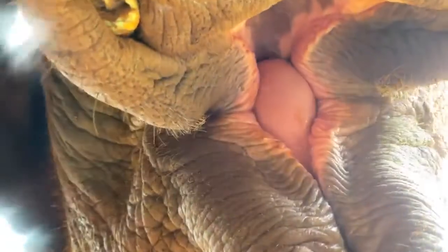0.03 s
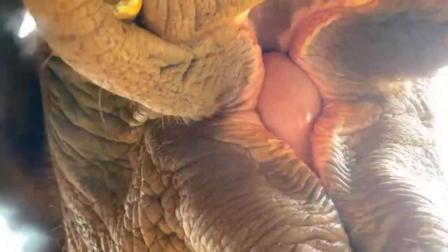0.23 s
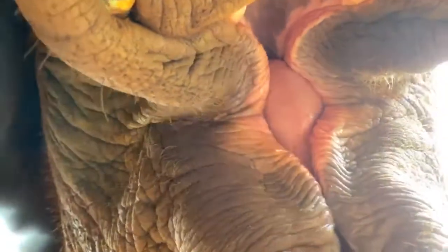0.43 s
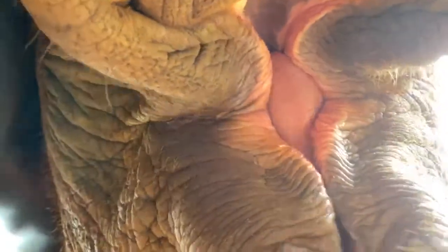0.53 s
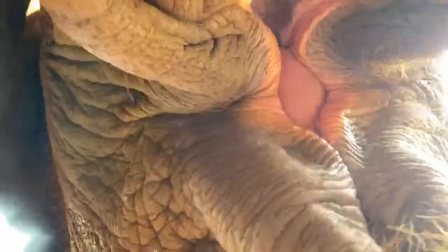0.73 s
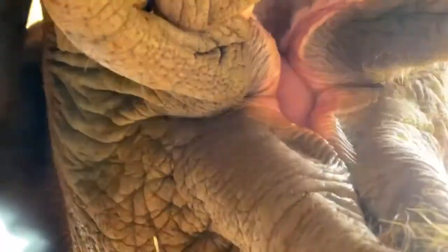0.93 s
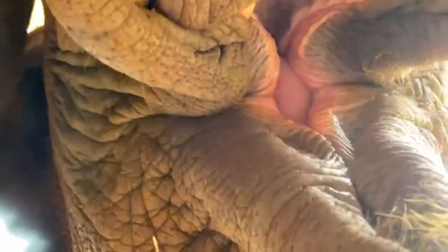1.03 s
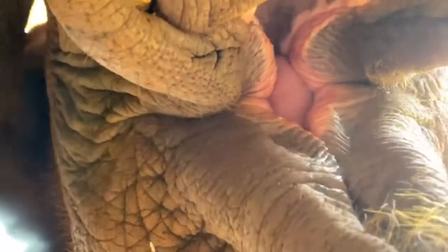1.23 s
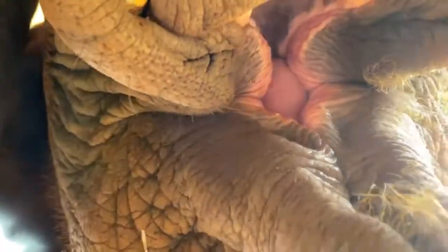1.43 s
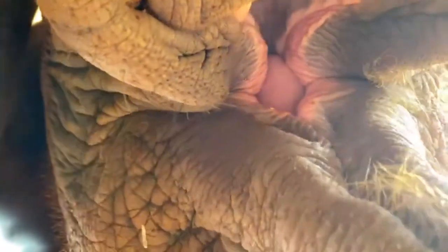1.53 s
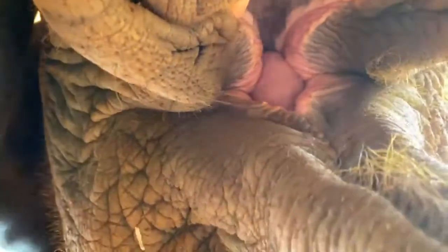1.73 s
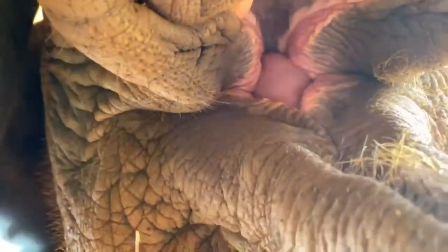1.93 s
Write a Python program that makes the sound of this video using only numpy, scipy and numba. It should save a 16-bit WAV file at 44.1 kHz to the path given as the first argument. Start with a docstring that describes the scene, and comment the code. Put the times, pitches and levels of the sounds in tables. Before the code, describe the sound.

A close elephant's deep growl builds, then fades into soft gulps and mouth smacks.

```python
"""A small stall, the microphone close to the wide-open mouth of a growling elephant.
Slow pulses of the vocal folds ring throat and mouth, quicken into a rough rumble, lock briefly
into a clean note and die away in a few low gulps. Breath thuds on the microphone and the wet mouth
smacks; then hay rustles in the trunk over a low background hum."""
import sys
import numpy as np
from scipy import signal
from scipy.fft import rfft, irfft
from scipy.io import wavfile
from scipy.ndimage import uniform_filter1d, minimum_filter1d
from numba import njit

SR = 44100
rng = np.random.default_rng(int(sys.argv[2]) if len(sys.argv) > 2 else 0)


def generate_wav(sig):
    """Save sig (samples, or channels by samples) to the path in sys.argv[1] as 16-bit PCM at SR."""
    pcm = np.round(np.clip(np.atleast_2d(sig).T, -1, 1) * 32767).astype(np.int16)
    wavfile.write(sys.argv[1], SR, pcm)


N = 88200

# centre of the throat resonance: t/s, f/Hz
THROAT_CENTRE = [(0, 148.1), (.19, 150.6), (.29, 196), (.33, 237), (.44, 223.7), (.48, 250), (.52, 250.4),
                 (.565, 250.7), (.59, 231.3), (.85, 233.3)]
# the clean note: t/s, f/Hz, level/dB
CLEAN_NOTE = [(.58, 108.8, -24.5), (.603, 109.9, -9.5), (.63, 107.9, -5), (.665, 107.3, -11.5),
              (.70, 106.7, -10.5), (.725, 95.8, -18), (.77, 107, -39)]
THROAT_PAN_DB, THROAT_ROOM_DB = 2, -17


def undb(db):
    return 10 ** (np.asarray(db) / 20)


def clock():
    return np.arange(N) / SR


def curve(table, column=1):
    """One column of a table, joined by straight lines in time."""
    table = np.array(table)
    return np.interp(clock(), table[:, 0], table[:, column])


def swell(at, length):
    """A bell-shaped rise and fall around one moment."""
    return np.exp(-.5 * ((clock() - at) / length) ** 2)


def unit(x):
    return x / np.sqrt(np.mean(x ** 2) + 1e-18)


def noise():
    return rng.standard_normal(N)


def grainy(spread_db):
    """Noise broken into tiny grains of uneven strength."""
    size = 64
    return unit(noise() * undb(spread_db * np.repeat(rng.standard_normal(N // size + 1), size)[:N]))


def even(x):
    """Hold the slow level at 1 and keep the single pulses."""
    size = int(.043 * SR)
    power = uniform_filter1d(uniform_filter1d(unit(x) ** 2, size), size // 2)
    return x / np.std(x) / np.sqrt(np.abs(power) + 1e-4)


def colour(x, points, tilt_db=0):
    """Causal filter with an outline (f/Hz, level/dB), a tilt per octave and steep skirts."""
    hz, db = np.array(points).T
    knots = np.log2(hz)
    octave = np.log2(np.maximum(np.fft.rfftfreq(2 * N, 1 / SR), 1))
    gain_db = np.interp(octave, knots, db) + tilt_db * (np.clip(octave, knots[0], knots[-1]) - 10)
    gain_db -= 24 * (np.maximum(octave - knots[-1], 0) + np.clip(knots[0] - octave, 0, 2))
    cepstrum = irfft(np.log(undb(gain_db)))
    cepstrum[1:N] *= 2  # folded for minimum phase
    cepstrum[N + 1:] = 0
    return irfft(rfft(x, 2 * N) * np.exp(rfft(cepstrum)))[:N]


@njit
def svf(x, hz, width):
    """State-variable band-pass with a moving centre."""
    y, band, low = np.empty(len(x)), 0., 0.
    for i in range(len(x)):
        g, damping = np.tan(np.pi * hz[i] / SR), width / hz[i]
        v = (band + g * (x[i] + 1e-18 - low)) / (1 + g * (g + damping))
        band, low, y[i] = 2 * v - band, low + 2 * g * v, damping * v
    return y


def resonate(x, hz, width):
    """A resonance applied twice, for steep sides; width of each pass in Hz."""
    hz = np.minimum(hz * np.ones(N), .45 * SR)
    return svf(svf(x, hz, float(width)), hz, float(width))


def place(x, pan_db, room_db, lag_s=.0001):
    """Direct sound plus the short echo of the stall; positive pan and lag favour the left."""
    t, t60_s = clock(), .15
    tail = rng.standard_normal((2, N)) * np.exp(-np.log(1000) * t / t60_s) * (t > .003)
    tail /= np.sqrt(np.sum(tail ** 2, axis=1, keepdims=True))
    direct = np.array([x, np.interp(t - lag_s, t, x)]) * undb(np.array([[pan_db], [-pan_db]]) / 2)
    echo = undb(room_db) * signal.fftconvolve(x[None], tail)[:, :N]
    return (direct + echo) / np.cosh(pan_db * np.log(10) / 40)


def hum():
    """Low background drone, nearly the same on both sides."""
    # spectrum of the drone: f/Hz, level/dB
    spectrum = [(20, -35.5), (40, -21), (58, 5), (75, -2), (105, -19), (148, -6.5), (185, -20.5),
                (260, -25.5)]
    # its slow drift: t/s, level/dB
    level = [(0, -32.5), (.8, -47), (1.05, -54), (1.4, -48.5), (1.7, -48.5), (2, -44)]
    return place(even(colour(noise(), spectrum)) * undb(curve(level)), pan_db=-1.5, room_db=-20)


def hay():
    """Dry stalks rub as the trunk brings them nearer, with one thin fizz on the way."""
    # spectrum of the rustle: f/Hz, level/dB
    spectrum = [(88, -32), (150, 5), (185, -20), (262, -13.5), (450, -0.5), (624, -6.5), (900, -2),
                (1050, -11), (1770, -8.5), (2270, -12), (2600, -10.5), (3030, -17), (6060, -21),
                (15000, -39)]
    # its rise and fall: t/s, level/dB
    level = [(0, -46.5), (.9, -54.5), (1.02, -63), (1.14, -56), (1.28, -53), (1.35, -62.5), (1.55, -60),
             (1.66, -52.5), (1.8, -47), (1.92, -47), (2, -44.5)]
    mid, side = (unit(colour(grainy(spread_db=1.5), spectrum)) for _ in range(2))
    rustle = np.array([mid + side, mid - side]) * undb(curve(level))
    fizz = unit(resonate(grainy(spread_db=6.5), hz=10640, width=7000))
    fizz *= undb(-74.5) * swell(at=1.244, length=.1)
    return rustle + place(fizz, pan_db=-7, room_db=11.5)


def puffs():
    """Air from the mouth thuds softly on the microphone."""
    # gusts of breath: t/s, length/s, level/dB
    gusts = [(0.064, 0.012, -28.5), (0.216, 0.1, -31.5), (0.464, 0.03, -35.5), (0.637, 0.012, -26)]
    # spectrum of the thud: f/Hz, level/dB
    spectrum = [(15, -29.5), (40, -16.5), (75, -6), (110, 7), (160, -17.5)]
    return even(colour(noise(), spectrum)) * sum(undb(db) * swell(at, span) for at, span, db in gusts)


def smacks():
    """Brief crackles of wet lips, tongue and trunk."""
    # wet contacts: t/s, decay/s, level/dB, tilt/(dB per octave)
    contacts = [(0.233, .011, -45, 8.5), (0.328, .0062, -42.5, 5.5), (0.733, .011, -33, -3.5),
                (.81, 0.031, -53, 8), (.861, 0.0054, -28.5, -1), (1.136, 0.0026, -36, -2),
                (1.27, 0.0079, -43, -10.5), (1.382, 0.0066, -48.5, 2.5), (1.467, 0.012, -55, 6.5),
                (1.574, 0.0084, -38, 0.5), (1.586, 0.0073, -44.5, 2.5), (1.667, 0.0081, -47, 7)]
    # spectrum of a smack: f/Hz, level/dB
    spectrum = [(60, -33), (200, 4), (400, 0), (650, -13), (1130, -1.5), (1900, -9.5), (2400, -12),
                (3400, -17.5), (4200, -20), (14000, -47.5)]
    out, attack_s = 0, .0015
    for at, decay, db, tilt_db in contacts:
        age = np.maximum(clock() - at, 0)
        envelope = (1 - np.exp(-age / attack_s)) * np.exp(-age / decay)
        out += unit(colour(grainy(spread_db=.5), spectrum, tilt_db)) * undb(db) * envelope
    return place(out, pan_db=4, room_db=2.5, lag_s=0)


def gulps():
    """Short hollow rings of the throat as it relaxes."""
    # rings after the growl: t/s, f/Hz, decay/s, relative level/dB
    rings = [(0.863, 374.8, 0.024, -35.5), (0.876, 209, 0.027, -43), (0.948, 176, 0.054, -36.5),
             (.956, 265.6, 0.018, -34), (1.048, 225, 0.0067, -32.5), (1.073, 183.6, 0.028, -37),
             (1.107, 203.5, 0.033, -41.5), (1.26, 328, 0.021, -48.5), (1.385, 274.6, 0.015, -49.5),
             (1.573, 251, 0.011, -42.5), (1.595, 189, 0.0038, -31)]
    out, attack_s = 0, .0019
    for at, hz, decay, db in rings:
        age = np.maximum(clock() - at, 0)
        envelope = (1 - np.exp(-age / attack_s)) * np.exp(-age / decay)
        out += 2 * undb(db) * np.sin(2 * np.pi * hz * age) * envelope
    return place(out, pan_db=2, room_db=-7)


def moan():
    """A thin wavering tone that climbs with the throat resonance and leads into the growl."""
    # course of the moan: t/s, level/dB
    level = [(0, -29), (.07, -28.5), (.13, -28), (.165, -34.5), (.21, -27), (.26, -21.5), (.30, -20),
             (.32, -28), (.35, -62.5)]
    wobble = unit(colour(noise(), [(10, .0055), (60, .016)]))
    phase = 2 * np.pi * np.cumsum(curve(THROAT_CENTRE) * (1 + .025 * wobble)) / SR
    tone = np.sqrt(2) * np.sin(phase) * undb(curve(level)) * (clock() < level[-1][0])
    return place(tone, pan_db=5, room_db=-6.5)


def note():
    """The folds lock into a steady pitch; the resonances of throat and mouth lift single harmonics."""
    # harmonics of the note: multiple, relative level/dB
    harmonics = [(2, 2), (3, -12), (4, -24.5), (5, -21.5), (6, -24), (7, -20), (8, -48), (9, -30)]
    # high harmonics that swell in passing: t/s, length/s, multiple, level/dB
    overtones = [(.622, .028, 22, -33.5), (.62, .028, 23, -33), (.64, .014, 11, -39), (.668, .016, 46, -38)]
    # ring of the mouth on the eighth harmonic: t/s, level/dB
    ring_level = [(.57, -44), (.61, -19), (.665, -16.5), (.695, -19.5), (.72, -30), (.76, -54)]
    t = clock()
    wobble = unit(colour(noise(), [(10, 0), (60, 0)]))
    phase = 2 * np.pi * np.cumsum(curve(CLEAN_NOTE) * (1 + .004 * wobble)) / SR
    gate = uniform_filter1d(1. * ((t > CLEAN_NOTE[0][0]) & (t < CLEAN_NOTE[-1][0])), size=400)
    tone = sum(undb(db) * np.sin(k * phase) for k, db in harmonics) * undb(curve(CLEAN_NOTE, column=2))
    tone += sum(undb(db) * swell(at, length) * np.sin(k * phase) for at, length, k, db in overtones)
    ring = np.sin(8 * phase) * undb(curve(ring_level))
    return np.sqrt(2) * (place(gate * tone, THROAT_PAN_DB, THROAT_ROOM_DB)
                         + place(gate * ring, pan_db=12.5, room_db=-22.5))


def folds():
    """Uneven pulses of the vocal folds, the rush of air after each and the air that leaks around it."""
    # bouts of pulses: start/s, end/s, rate/Hz, period jitter (0-1), share of air (0-1)
    bouts = [(.038, .26, 19.8, .02, .6), (.312, .41, 23.1, .005, .15), (.421, .495, 48, .015, .2),
             (.508, .59, 42.8, .008, .15), (.597, .735, 107, .025, .5), (.742, .81, 55, .15, .5),
             (.824, .87, 45, .04, .4)]
    air_decay_s, open_samples = .018, int(.015 * SR)
    pulses = np.zeros(N)
    for start, end, rate, jitter, _ in bouts:
        at = start
        for late, strength_db in rng.standard_normal((24, 2)):
            if at < end:
                pulses[int(at * SR)] += undb(strength_db) / np.sqrt(rate)
            at += max(1 + jitter * late, .3) / rate
    fall = 2 / (air_decay_s * SR)
    flow = signal.lfilter([1], [1, -np.exp(-fall)], pulses ** 2) * fall
    opening = uniform_filter1d(uniform_filter1d(pulses ** 2, open_samples), open_samples)
    # the mean terms keep a little air moving between pulses
    rush = grainy(spread_db=3) * np.sqrt(np.abs(uniform_filter1d(flow, size=150)) + .028 * flow.mean())
    leak = grainy(spread_db=3) * np.sqrt(np.abs(opening) + .008 * opening.mean())
    air_share = curve([((start + end) / 2, air) for start, end, _, _, air in bouts])
    return pulses + air_share * rush, rush, leak


def rasp(leak, upper_db):
    """Air leaking through the folds lights up the upper resonances of the mouth."""
    # upper resonances of the mouth: f/Hz, width/Hz, relative level/dB
    upper_modes = [(1690, 70, 3), (2160, 120, -2), (2500, 140, 4)]
    # resonances of the high rasp: f/Hz, width/Hz, relative level/dB
    rasp_modes = [(3434, 730, 2.5), (4730, 420, 4.5), (6160, 120, -3.5), (6290, 340, -6.5),
                  (8050, 200, -14), (10800, 5200, -25)]
    # course of the high rasp: t/s, level/dB
    rasp_level = [(0, -54), (.24, -56), (.3, -53), (.34, -54.5), (.44, -54), (.48, -48.5), (.55, -60),
                  (.57, -43), (.68, -50), (.78, -69), (.85, -60.5), (.93, -101)]
    # low cut that keeps the high rasp thin and bright: f/Hz, gain/dB
    low_cut = [(1200, -15), (1600, 0), (15000, 0)]
    # resonances that sing out briefly: t/s, length/s, f/Hz, width/Hz, level/dB
    whistles = [(.15, .025, 1680, 60, -46), (.39, .018, 1210, 130, -38), (.43, .014, 5550, 220, -54),
                (.52, .011, 3520, 240, -39), (.578, .009, 3580, 200, -40)]
    treble = 0
    for modes, level_db in (upper_modes, upper_db), (rasp_modes, curve(rasp_level)):
        ringing = sum(undb(db) * resonate(leak, hz, width) for hz, width, db in modes)
        treble += even(ringing) * undb(level_db)
    treble = colour(treble, low_cut)
    for at, length, hz, width, db in whistles:
        treble += even(resonate(leak, hz, width)) * undb(db) * swell(at, length)
    return place(treble, pan_db=7, room_db=-2.5, lag_s=0)


def growl(pulses, rush, leak):
    """The pulses ring throat and open mouth, close to the microphone and a little to its left."""
    # course of the growl: t/s, throat level/dB, mouth level/dB, treble level/dB
    levels = [(0, -38, -31.5, -36), (.05, -30, -43.5, -51), (.16, -46, -39, -48), (.20, -33.5, -40, -47),
              (.295, -22, -56, -43.5), (.32, -11.5, -40.5, -52), (.39, -14, -32, -54),
              (.45, -1.5, -22, -46), (.49, -16, -24, -62), (.52, -0.5, -23, -56.5), (.575, -2, -16, -43),
              (.62, -3, -25, -40), (.70, -21, -30, -56.5), (.73, -20.5, -36, -50), (.765, -22, -63, -73.5),
              (.79, -33.5, -82, -59), (.845, -22, -64, -50.5), (.89, -56, -48, -85), (.94, -70, -88, -72)]
    # hollow knock of the pulses: t/s, level/dB
    knock_level = [(0, -23), (.05, -29.5), (.11, -31.5), (.15, -48), (.195, -23.5), (.24, -28.5),
                   (.29, -18.5), (.36, -22), (.47, -13.5), (.51, -27.5), (.60, -20), (.72, -47)]
    # the throat passes only the bass: f/Hz, gain/dB
    throat_band = [(60, 0), (380, 0), (800, -14)]
    # broad body of the voice, under both resonances: f/Hz, level/dB
    body_spectrum = [(40, -26), (80, -31.5), (130, -33.5), (220, 10.5), (300, 10.5), (420, 0.5),
                     (600, -1.5), (730, -3.5), (1000, -27.5), (1250, -36)]
    # course of that body: t/s, level/dB
    body_level = [(0, -41), (.2, -40), (.29, -43.5), (.33, -25.5), (.365, -25.5), (.475, -26), (.54, -28.5),
                  (.62, -20), (.72, -22.5), (.79, -74), (.85, -44), (.93, -105)]
    # centre of the mouth resonance: t/s, f/Hz
    mouth_centre = [(0, 800), (.19, 750), (.26, 880), (.40, 910), (.49, 915), (.57, 872), (.68, 850),
                    (.76, 790)]
    # the rough voice gives way while the clean note sounds
    rough = 1 - .65 * np.minimum(1, undb(curve(CLEAN_NOTE, column=2) + 12))
    throat = even(resonate(pulses, curve(THROAT_CENTRE), width=66)) * undb(curve(levels)) * rough
    knock = even(resonate(pulses, hz=289, width=67)) * undb(curve(knock_level))
    knock *= clock() < knock_level[-1][0]
    body = even(colour(pulses + .5 * rush, body_spectrum)) * undb(curve(body_level)) * rough
    vowel = pulses + .2 * rush
    for _ in range(2):
        vowel = resonate(vowel, curve(mouth_centre), width=190)
    mouth = even(vowel) * undb(curve(levels, column=2)) * rough
    return (place(colour(throat + knock, throat_band), THROAT_PAN_DB, THROAT_ROOM_DB)
            + place(body, pan_db=4, room_db=12)
            + place(mouth, pan_db=12, room_db=-2.5)
            + rasp(leak, upper_db=curve(levels, column=3)))


def scene():
    return moan() + growl(*folds()) + note() + puffs() + gulps() + smacks() + hay() + hum()


def record(dry):
    """A limiter holds the loudest peaks; the top is cut."""
    ceiling, top_hz = 1.00864, 15500
    peak = -minimum_filter1d(-np.abs(dry).max(axis=0), size=500)
    gain = uniform_filter1d(np.minimum(1, ceiling / (peak + 1e-9)), size=400)
    return signal.sosfilt(signal.ellip(8, .2, 70, top_hz, fs=SR, output="sos"), dry * gain)


dry = scene()
out = record(dry)
generate_wav(out)
```